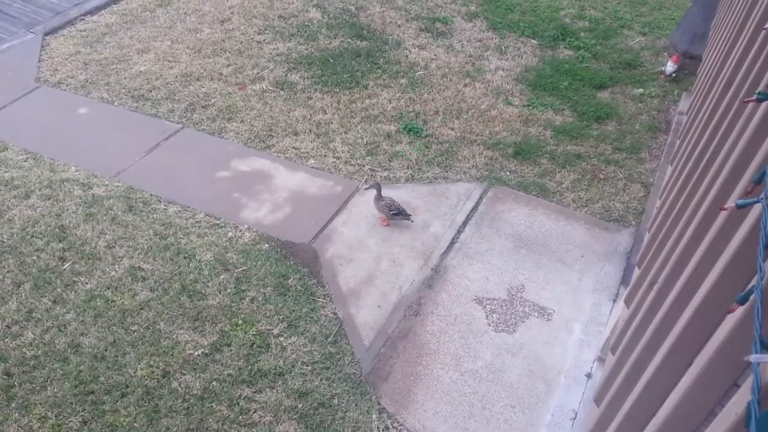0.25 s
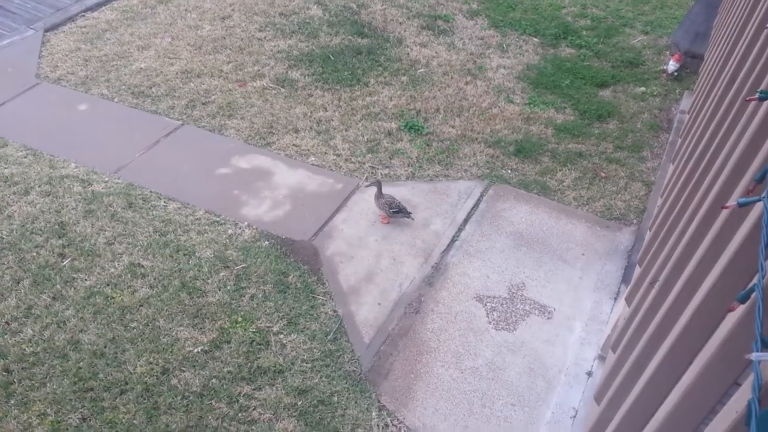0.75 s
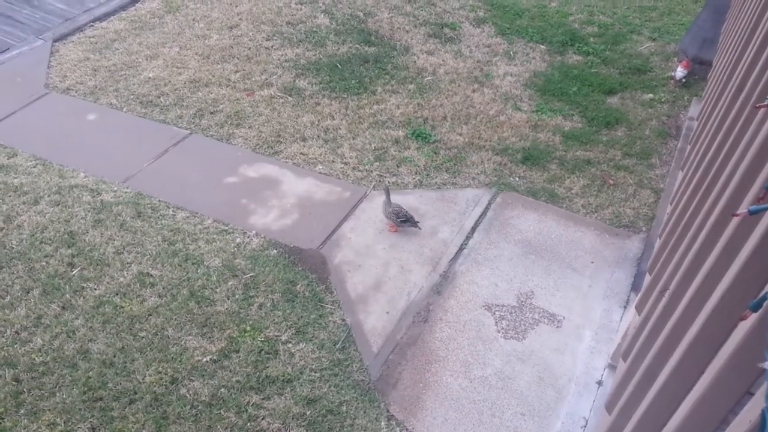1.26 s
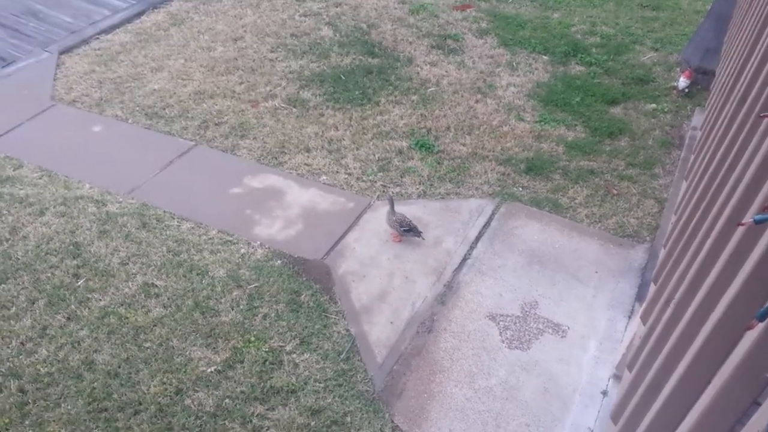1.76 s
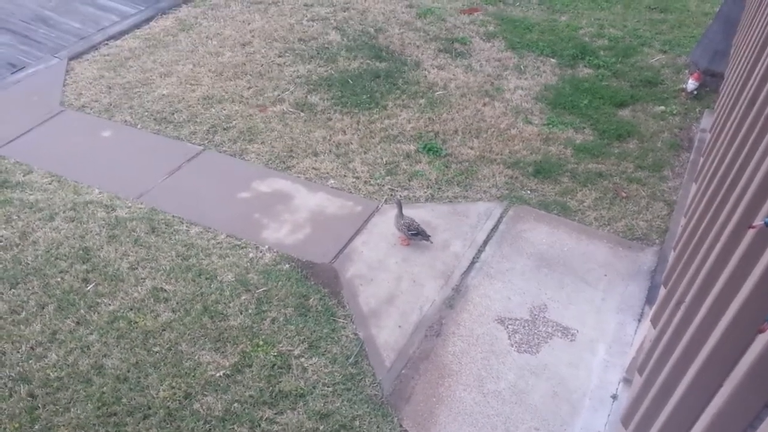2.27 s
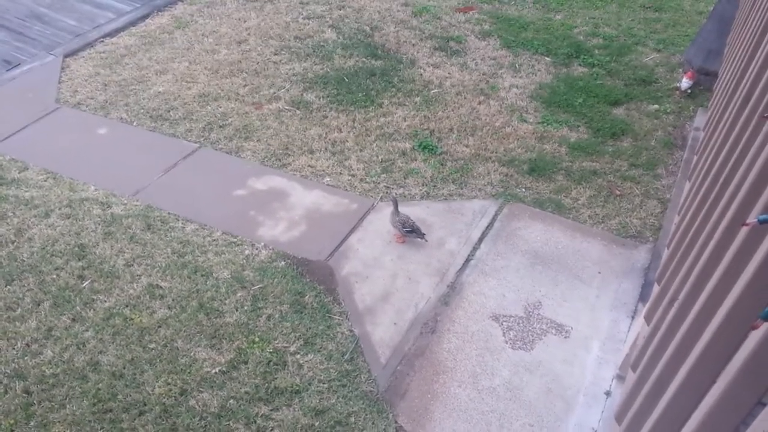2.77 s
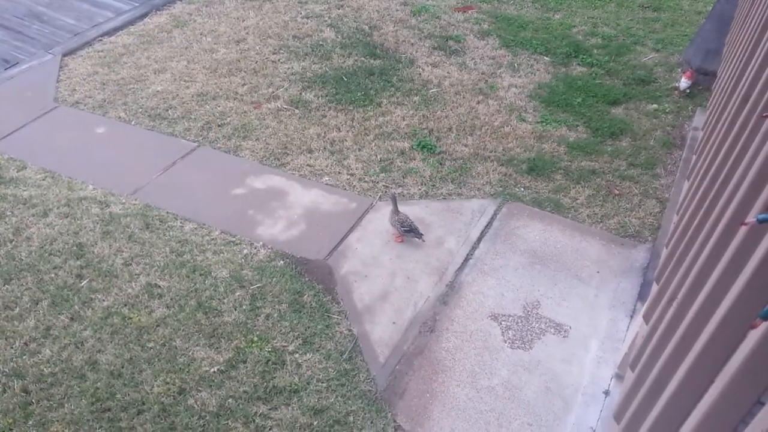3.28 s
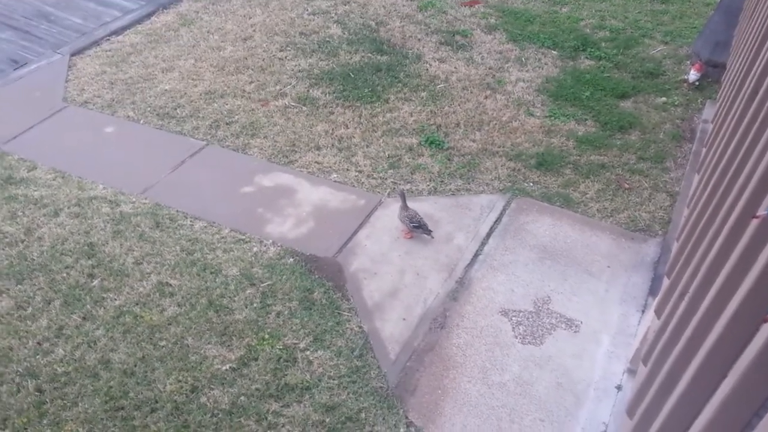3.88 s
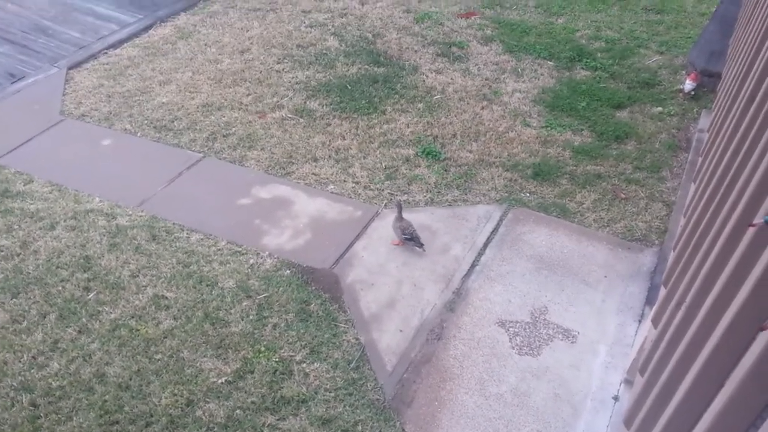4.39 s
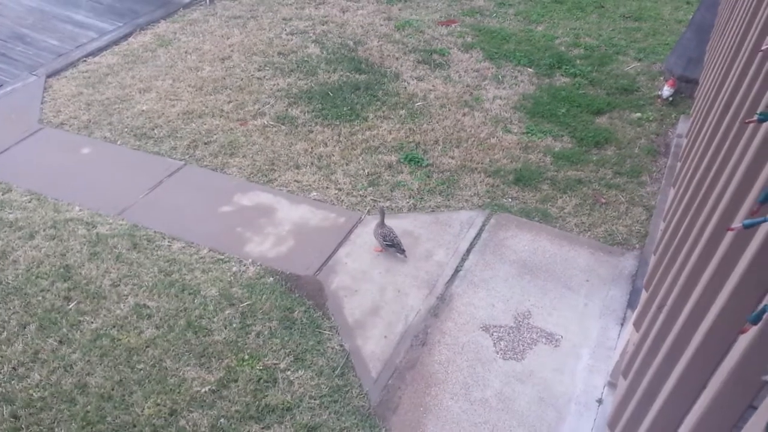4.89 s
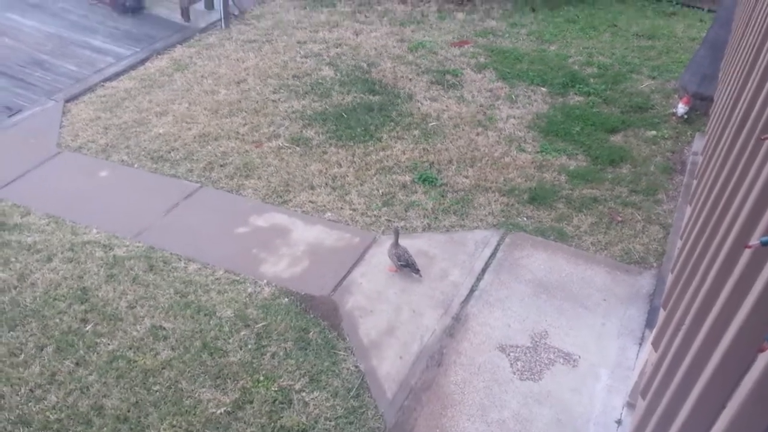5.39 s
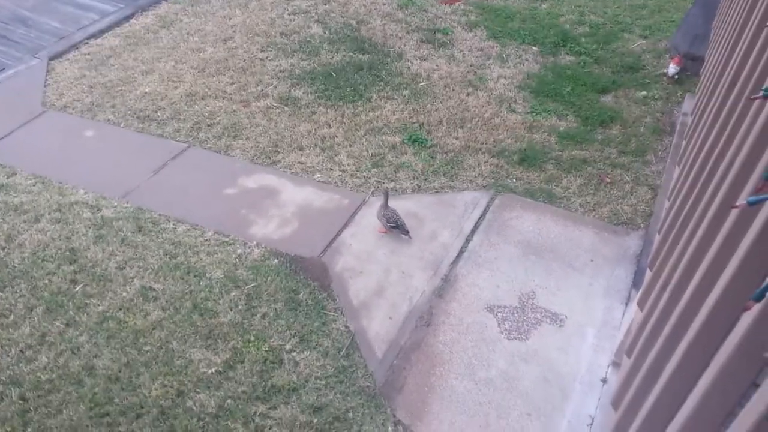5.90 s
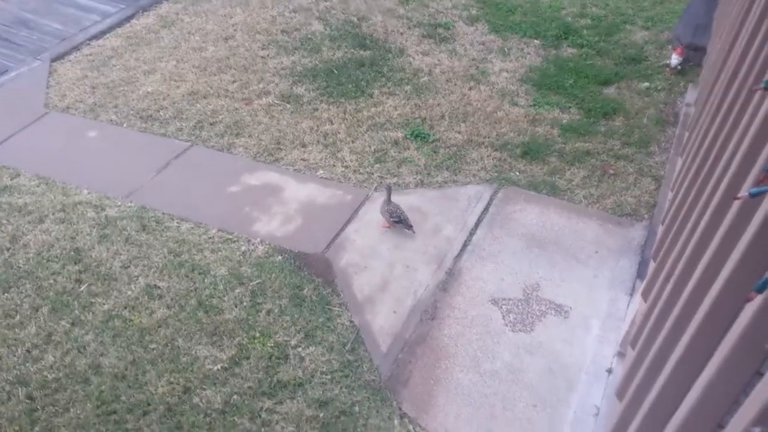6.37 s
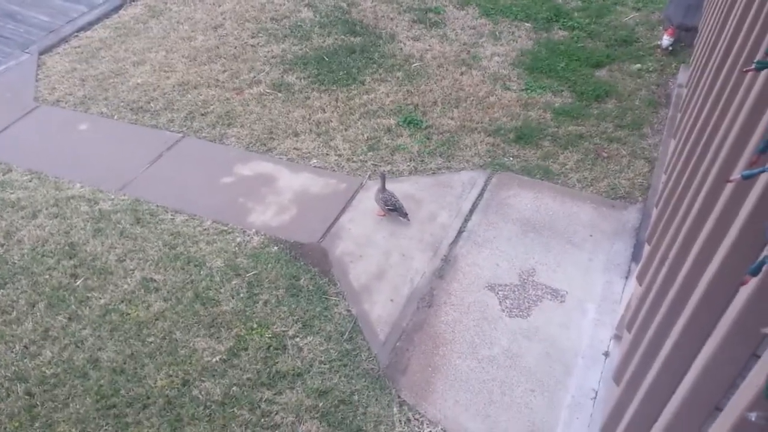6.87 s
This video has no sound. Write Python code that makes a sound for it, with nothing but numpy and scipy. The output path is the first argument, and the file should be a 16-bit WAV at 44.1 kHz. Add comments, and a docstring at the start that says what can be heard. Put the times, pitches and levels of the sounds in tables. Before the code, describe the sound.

A single duck calls steadily in an open yard: one strong quack at about one second, then nine quieter ones at a regular pace. The sound begins slightly muffled on the left until a finger shifts off the microphone, with dull knocks. Later, sharper handling clicks land left, then right. A far gull cries very faintly, tiny birds chirp, and distant low rumble drones beneath soft air.

```python
"""Duck on a waterside path

Concrete path by the water, a duck a few metres from the microphone: ten quacks.
Each is a rough pulse train in the throat's resonances; a fence and far banks throw it back.
A finger shifts on the left port and knocks click on the casing.
Small birds chirp as sine glides, a far gull calls in three harmonics, and filtered noise with
a wavering drone makes the low rumble and soft rush of air beneath."""
import sys
import numpy as np
from scipy import signal
from scipy.fft import rfft, irfft
from scipy.io import wavfile
from scipy.ndimage import uniform_filter1d

SR = 44100
rng = np.random.default_rng(int(sys.argv[2]) if len(sys.argv) > 2 else 0)


def generate_wav(signal):
    """Clip the signal to [-1, 1] and save it as 16-bit WAV at the path in sys.argv[1]."""
    frames = np.transpose(np.atleast_2d(signal))
    scaled = np.clip(frames, -1, 1) * 32767
    pcm = np.round(scaled).astype(np.int16)
    wavfile.write(sys.argv[1], SR, pcm)


N = 314874

# The duck's calls, a few metres off: t/s, length of the push/s, level/dB, settled pitch f/Hz,
# open-bill resonance f/Hz, then relative level/dB of: low throat, 1.2 kHz whistle at the end of
# the push, 2.6 kHz edge, 3.5 kHz ring, 5.6 kHz ring
DUCK_CALLS = [(0.989, 0.14, -16, 179.6, 1974, -12, -9, -11.5, -14.5, -16),
              (1.684, 0.19, -21.5, 171.7, 2010, -13, -13.5, -8.5, -9.5, -15.5),
              (2.350, 0.18, -22, 171, 1990, -13, -10, -6.5, -9, -14),
              (2.936, 0.18, -21.5, 170.9, 2030, -14, -13.5, -7.5, -9, -14.5),
              (3.526, 0.18, -22, 164.4, 1890, -15.5, -11, -5, -7.5, -12.5),
              (4.119, 0.19, -21.5, 166, 1970, -15.5, -11, -11, -13, -7.5),
              (4.694, 0.18, -23, 168.1, 1920, -13, -10, -7, -11.5, -7),
              (5.319, 0.19, -21.5, 168.7, 1900, -13, -5, -5.5, -17, -9.5),
              (5.919, 0.18, -21, 168.3, 1920, -14, -7.5, -6.5, -19.5, -9.5),
              (6.61, 0.16, -21.5, 163.7, 1750, -14.5, -12.5, -6.5, -22, -11.5)]


def duck():
    """The duck on the path: each push of breath gives one quack."""
    return sum(quack(call) for call in DUCK_CALLS)


# Resonances of the windpipe and bill, low to high: f/Hz, width/Hz, relative level/dB
THROAT_MODES = [(331, 59, 2), (703, 93, 6), (965, 62, 5.5)]
# The edge on the voice: f/Hz, width/Hz, relative level/dB
EDGE_MODES = [(2550, 220, 0)]
# The ring of the bill: f/Hz, width/Hz, relative level/dB
RING_MODES = [(3374, 470, 16.3), (4590, 660, 1.5)]
# The ring above it: f/Hz, width/Hz, relative level/dB
HIGH_MODES = [(4740, 980, -3), (5474, 410, 5), (6150, 590, -2)]
# The rasp on top: f/Hz, width/Hz, relative level/dB
RASP_MODES = [(7170, 1570, 0.5), (8570, 1900, -2), (11200, 2200, -8.5)]
# the breath pressure builds up from this far below, and dies away after the push
ATTACK_S, ATTACK_DEPTH_DB = 0.015, 19.5
RELEASE_DB_PER_S, RELEASE_S = 352, 0.12
SCOOP_SHARE, SCOOP_S = 0.17, 0.05   # the pitch starts this much flat and slides up
SHUT_BILL_HZ, BILL_OPENING_S = 1600, 0.065   # the main resonance climbs from here
EDGE_SHUT_DB = -3   # the edge is weaker while the bill is shut
WHISTLE_SWELL_DB_PER_S = 27   # the whistle grows until the push ends
WHISTLE_FLUTTER_DB, FLUTTER_PER_S = 4.5, 35.6
# taken off the release, so that these die more slowly than the voice
HISS_LINGERS_DB_PER_S, WHISTLE_LINGERS_DB_PER_S = 64, 63
# share by which the cycles vary, before and after the voice settles
SHUT_ROUGHNESS, OPEN_ROUGHNESS = 0.025, 0.0055


def quack(call, treble_fade_s=0.02):
    """A push of breath scoops the pitch up while the opening bill lifts and widens its resonance."""
    s, push_s, level_db, top_hz, open_hz, low_db, whistle_db, edge_db, ring_db, high_db = call
    t = np.arange(int((push_s + RELEASE_S) * SR)) / SR
    released_s = np.maximum(t - push_s, 0)
    effort_db = level_db - ATTACK_DEPTH_DB * np.exp(-t / ATTACK_S) - RELEASE_DB_PER_S * released_s
    pitch = top_hz * (1 - SCOOP_SHARE * np.exp(-(t / SCOOP_S) ** 2))
    shut = np.exp(-(t / BILL_OPENING_S) ** 2)
    bill_hz = open_hz + shut * (SHUT_BILL_HZ - open_hz)

    pulses, air = syrinx(pitch, OPEN_ROUGHNESS + shut * (SHUT_ROUGHNESS - OPEN_ROUGHNESS))
    # higher resonances are fed ever more air
    clean = pulses + 0.2 * air
    voiced = pulses + (0.55 + 0.5 * shut) * air
    hoarse = pulses + 2.0 * air
    airiest = pulses + 3.0 * air

    low = band(resonate(clean, THROAT_MODES), [260, 1050])
    main = bill_voice(voiced, bill_hz, t)
    edge = band(resonate(hoarse, EDGE_MODES), [2250, 2850], order=3)
    ring = band(resonate(hoarse, RING_MODES), [2900, 5000])
    high = band(resonate(hoarse, HIGH_MODES), [4700, 7200], order=3)
    rasp = band(resonate(airiest, RASP_MODES), [6500, 10800], order=5)

    # the treble fades in at the start of each quack
    treble_gain = np.clip(t / treble_fade_s, 0, 1) * from_db(HISS_LINGERS_DB_PER_S * released_s)
    treble = panned(levelled(edge), 10.0) * from_db(edge_db + EDGE_SHUT_DB * shut)
    treble = treble + panned(levelled(ring), 11.7) * from_db(ring_db)
    treble = treble + panned(levelled(high), 7.6) * from_db(high_db)
    treble = treble + panned(levelled(rasp), -6.0) * from_db((ring_db + high_db) / 2 - 7.0)

    body = panned(levelled(main, size=560), 4.8) * from_db(2.0)
    body = body + panned(levelled(low), 1.5) * from_db(low_db)
    body = body + throat_whistle(pitch, whistle_db, push_s, t)
    sound = (body + treble_gain * treble) * from_db(effort_db)
    return np.pad(sound, ((0, 0), (int(s * SR), N)))[:, :N]


def bill_voice(voiced, bill_hz, t):
    """Two moving bill resonances and a fixed throat one, kept between 1340 and 2450 Hz."""
    # a nearly shut bill radiates little, so its resonances ring longer
    gape = np.clip(t / 0.08, 0.65, 1)
    first = glide(voiced, bill_hz * 0.96, 235 * gape)
    second = glide(voiced, bill_hz * 1.16, 250 * gape)
    throat = signal.lfilter(*resonator(1683, 280), voiced)
    main = first - gape * from_db(-4) * second + from_db(-7.5) * throat
    return band(band(main, 1340, "high", order=8), 2450, "low", order=5)


def throat_whistle(pitch, whistle_db, push_s, t, lowest_hz=1060, order=7):
    """The seventh harmonic rings out as a fluttering whistle once the pitch is up."""
    n = len(t)
    wavering_hz = order * pitch * (1 + 0.0098 * drift(56.3, size=n))
    tone = np.sqrt(2) * np.sin(2 * np.pi * np.cumsum(wavering_hz) / SR)
    tone = tone * np.clip((order * pitch - lowest_hz) / 80, 0.3, 1)
    swell_db = whistle_db - WHISTLE_SWELL_DB_PER_S * np.maximum(push_s - t, 0)
    linger_db = WHISTLE_LINGERS_DB_PER_S * np.maximum(t - push_s, 0)
    flutter_db = WHISTLE_FLUTTER_DB * drift(FLUTTER_PER_S, size=n)
    return tone * from_db(swell_db + linger_db + flutter_db)


def syrinx(pitch, roughness, shimmer_db=4.0):
    """Membranes slap shut once a cycle, a little unevenly, and let through a puff of turbulent air."""
    jitter_s, puff_decay = 0.00007, 2.5   # puff decay in e-folds per cycle
    n = len(pitch)
    cycles = np.cumsum(pitch * (1 + roughness * drift(110, size=n))) / SR
    slaps = np.flatnonzero(np.diff(np.floor(cycles)))
    chance = rng.standard_normal((64, 2))[:len(slaps)]
    shifted = slaps + (jitter_s * SR * chance[:, 0]).astype(int)
    pulses = np.zeros(n)
    pulses[np.clip(shifted, 0, n - 1)] = from_db(shimmer_db * chance[:, 1])
    # the turbulence reaches the two ports partly alike
    air = rng.standard_normal(n) + rng.standard_normal((2, n))
    return rms_one(pulses), rms_one(air * np.exp(-puff_decay * (cycles % 1)))


# Far reflections off buildings and banks: delay t/s, spread/s, level/dB round 2 kHz,
# level/dB round 5.6 kHz
FAR_ECHOES = [(0.043, 0.0078, -6, -4), (.15, 0.06, -20, -13.5), (0.261, .05, -19, -11.5),
              (.42, 0.074, -33, -23)]


def waterfront(x):
    """Fence slats scatter mostly treble, differently at each ear; buildings and banks answer later."""
    fence = scatter(0.001, 0.011)
    response = from_db(-4.5) * band(fence, 1400, "high")
    response = response + from_db(-4) * band(fence, 3200, "high", order=4)
    for delay_s, spread_s, mid_db, top_db in FAR_ECHOES:
        cloud = scatter(delay_s, spread_s)
        response = response + from_db(mid_db) * band(cloud, [1650, 2700])
        response = response + from_db(top_db) * band(cloud, [5000, 6200])
    return x + signal.fftconvolve(x, response, axes=1)[:, :N]


def scatter(delay_s, spread_s):
    """A rough surface returns a dying cloud of small reflections, of unit energy at each ear."""
    t = np.arange(SR) / SR - delay_s
    cloud = rng.standard_normal((2, SR)) * (t > 0) * np.exp(-np.abs(t) / spread_s)
    return cloud / np.sqrt(np.sum(cloud ** 2, axis=1, keepdims=True))


def ports(x):
    """The calls reach the left port a little before the right one."""
    lead_s = 0.00005
    delay = np.exp(-2j * np.pi * np.fft.rfftfreq(N, 1 / SR) * lead_s)
    return np.array([x[0], irfft(rfft(x[1]) * delay, N)])


def finger_on_port(x, lift_s=1.63, shade_hz=3500, shade_db=-7.5, right_db=-3.0, glint_db=-8.0):
    """Until it lifts, a finger muffles the left port and lowers the right one, its treble less."""
    covered = np.clip((lift_s - np.arange(N) / SR) / 0.24, 0, 1)   # gone by lift_s
    left = from_db(shade_db) * band(x[0], shade_hz, "low", order=1)
    right = from_db(right_db) * x[1] + from_db(glint_db) * band(x[1], [3000, 7000], order=1)
    return x + covered * (np.array([left, right]) - x)


# Knocks on the microphone casing: t/s, spike level/dB, left over right level/dB, dullness f/Hz,
# thud share, ring share
CASING_KNOCKS = [(1.243, -14.5, 31, 906, 0.6, 0), (1.312, -12, 33, 1470, 0.59, 0),
                 (1.3167, -22, 12, 1100, 0.35, 0), (1.38, -15.5, 33, 4640, 0.27, 0),
                 (3.544, -38.5, 7, 6000, 0.024, 0.46), (3.957, -12, 32, 3120, 0.57, 0.59),
                 (4.505, -17.5, 25, 7000, 0.054, 0.4), (5.856, -17.5, -18, 8400, 0.016, 0),
                 (5.863, -29, -3, 7920, 0.022, 0.32), (5.8717, -16.5, -20, 7800, 0.12, 0)]


def knocks(thud_hz=170, ring_hz=5500, size=2000):
    """Each touch is a sharp spike, a short heavily damped swing of the casing and a brief ring."""
    out, click = np.zeros((2, N + size)), signal.unit_impulse(size)
    for s, peak_db, pan_db, dull_hz, thud, ring_share in CASING_KNOCKS:
        spike = band(band(click, dull_hz, "low"), 10500, "low", order=6)
        swing = signal.lfilter(*resonator(thud_hz, 330), spike)
        ring = signal.lfilter(*resonator(ring_hz, 710), spike)
        blow = spike / spike.max() + thud * swing / np.abs(swing).max() + ring_share * ring / ring.max()
        blow = band(blow, 74, "high", order=1)
        start = int(s * SR)
        out[:, start:start + size] -= panned(from_db(peak_db) * blow, pan_db)
    return out[:, :N]


# A far gull, its pitch and level joined point to point: t/s, pitch f/Hz, level/dB
FAR_GULL = [(1.17, 1080, -60), (1.205, 1010, -47), (1.245, 960, -43), (1.29, 1020, -45), (1.33, 1060, -45),
            (1.37, 950, -51), (1.4, 900, -66)]
# Small birds: t/s, length/s, start f/Hz, middle f/Hz, end f/Hz, level/dB
BIRD_CHIRPS = [(0.336, 0.08, 2400, 2620, 2670, -43), (2.273, 0.084, 2700, 2890, 2660, -40),
               (5.03, 0.044, 3600, 3400, 2850, -40.5), (5.085, 0.069, 5600, 6290, 6700, -31.5),
               (5.145, 0.028, 5900, 5620, 5740, -37), (5.174, 0.117, 6400, 6440, 6450, -43),
               (6.428, 0.043, 7500, 8500, 8400, -58), (6.546, 0.048, 5700, 5890, 5030, -41),
               (6.878, 0.035, 2650, 2830, 2780, -45), (7.017, 0.055, 7000, 7300, 7360, -50)]


def birds(warble=0.032):
    """Small birds give short wavering glides; only a far gull's third to fifth harmonics carry."""
    t = np.arange(N) / SR
    s, hz, db = np.transpose(FAR_GULL)
    phase = 2 * np.pi * np.cumsum(np.interp(t, s, hz)) / SR
    harmonics = np.sin(3 * phase) + 0.8 * np.sin(4 * phase) + 0.8 * np.sin(5 * phase)
    out = from_db(np.interp(t, s, db)) * (t > s[0]) * (t < s[-1]) * harmonics
    for at, length_s, *path_hz, level_db in BIRD_CHIRPS:
        u = np.linspace(0, 1, int(length_s * SR))
        path = np.polyval(np.polyfit([0, 0.5, 1], path_hz, 2), u)   # a parabola through the three
        pitch = path * (1 + warble * drift(375, size=len(u)))
        chirp = from_db(level_db) * np.sin(np.pi * u) * np.sin(2 * np.pi * np.cumsum(pitch) / SR)
        out = out + np.pad(chirp, (int(at * SR), N))[:N]
    return panned(out, 15.0)


# Colour of the distant rumble: f/Hz, relative level/dB per Hz
RUMBLE_COLOUR = [(15, -56), (25, -21), (64, -8.5), (131, -1.5), (186, -7), (219, -8.5), (250, -14),
                 (363, -9.5), (515, -30.5), (637, -13.5), (1420, -33), (8550, -45.5), (13800, -46.5),
                 (15000, -111)]
# Course of the soft rush of air: t/s, relative level/dB (the whole curve is set 3.5 dB lower)
AIR_LEVEL = [(0.0, -43.5), (0.73, -45), (1.19, -37.5), (2.2, -37), (7.14, -37.5)]
# Colour of the soft rush of air: f/Hz, relative level/dB per Hz
AIR_COLOUR = [(100, -15.5), (300, -3), (700, 0), (1200, -6.5), (3000, -11.5), (8000, -19.5), (14000, -93)]


def surroundings(rumble_db=-39.5, hum_hz=121, hum_db=-49):
    """Distant rumble with a wavering drone, and a soft rush of air."""
    t = np.arange(N) / SR
    rumble = from_db(rumble_db) * banded_noise(RUMBLE_COLOUR, patchy_db=2.0)
    hum_phase = 2 * np.pi * np.cumsum(hum_hz + 3 * drift(11)) / SR
    drone = from_db(hum_db + drift(14)) * np.sin(hum_phase)
    air_gain = from_db(np.interp(t, *np.transpose(AIR_LEVEL)) - 3.5)
    breeze = air_gain * banded_noise(AIR_COLOUR, patchy_db=1.0)
    return panned(rumble + drone + breeze, 1.1)


# How alike the background is at the two ports: f/Hz, left-right likeness [correlation]
PORT_LIKENESS = [(40, 0.93), (150, 0.97), (500, 0.77), (1500, 0.057), (5000, 0.043), (14000, .1)]


def banded_noise(spectrum, patchy_db):
    """Half-octave bands of stereo noise, each with its own flicker and likeness, at unit rms."""
    out, edges = 0, 25 * 2 ** np.arange(0, 9.6, 0.5)
    white = rng.standard_normal((2, 2, N))
    for k, (low, high) in enumerate(zip(edges, edges[1:])):
        mid, side = band(white[k % 2], [low, high])   # neighbouring bands use different noise
        hz = np.sqrt(low * high)
        alike = np.clip(at_hz(PORT_LIKENESS, hz), -1, 1)
        gain = from_db(at_hz(spectrum, hz) + patchy_db * drift(12))
        out = out + gain * (np.sqrt(1 + alike) * mid + np.sqrt(1 - alike) * side * [[1], [-1]])
    return rms_one(out)


def from_db(db):
    """Decibels to gain."""
    return 10 ** (np.asarray(db) / 20)


def rms_one(x):
    """Scale to unit rms."""
    return x / np.sqrt(np.mean(x ** 2) + 1e-20)


def at_hz(points, hz):
    """Read a spectrum on a log-frequency axis."""
    points_hz, values = np.transpose(points)
    return np.interp(np.log(hz), np.log(points_hz), values)


def band(x, edges_hz, kind="band", order=2):
    """Butterworth filter."""
    edges_hz = np.clip(edges_hz, 10, 0.45 * SR)
    return signal.sosfilt(signal.butter(order, edges_hz, kind, fs=SR, output="sos"), x)


def drift(rate, size=N):
    """Random wander: straight lines between normal draws of unit spread, rate of them a second."""
    knots = np.arange(size) * rate / SR
    count = int(knots[-1]) + 2
    return np.interp(knots, np.arange(count), rng.standard_normal(count))


def panned(x, pan_db):
    """Left and right gains pan_db apart whose mean is one."""
    gains = from_db([[pan_db / 2], [-pan_db / 2]])
    return x * gains / gains.mean()


def resonator(hz, width_hz):
    """Two-pole resonance with gain about 1 on top."""
    r = np.exp(-np.pi * width_hz / SR)
    return (1 - r * r) / 2 * np.array([1, 0, -1]), [1, -2 * r * np.cos(2 * np.pi * hz / SR), r * r]


def resonate(x, modes):
    """Parallel resonances of alternating sign."""
    out = 0
    for k, (hz, width_hz, db) in enumerate(modes):
        out = out + (-1) ** k * from_db(db) * signal.lfilter(*resonator(hz, width_hz), x)
    return out


def glide(x, hz, width_hz, size=64):
    """A resonance whose centre and width move, block by block."""
    out, state = np.zeros(x.shape), np.zeros((2, 2))
    for i in range(0, len(hz), size):
        b, a = resonator(hz[i], width_hz[i])
        out[:, i:i + size], state = signal.lfilter(b, a, x[:, i:i + size], zi=state)
    return out


def levelled(x, size=900):
    """Even out each channel's level over a few pulses."""
    return x / np.sqrt(np.abs(uniform_filter1d(x * x, size)) + 1e-12)


def scene():
    """The duck and other birds in their surroundings, and the handling of the microphone."""
    calls = waterfront(duck() + birds())
    return finger_on_port(ports(calls)) + surroundings() + knocks()


def record(dry):
    """The deepest bass is rolled off, the tallest peaks are rounded and the top is cut steeply."""
    ceiling, cutoff_hz = 0.92, 14700
    x = band(dry, 24, "high", order=1)
    rounded = x / (1 + (x / ceiling) ** 6) ** (1 / 6)
    return signal.sosfilt(signal.ellip(10, 0.1, 90, cutoff_hz, fs=SR, output="sos"), rounded)


dry = scene()
out = record(dry)
generate_wav(out)
```